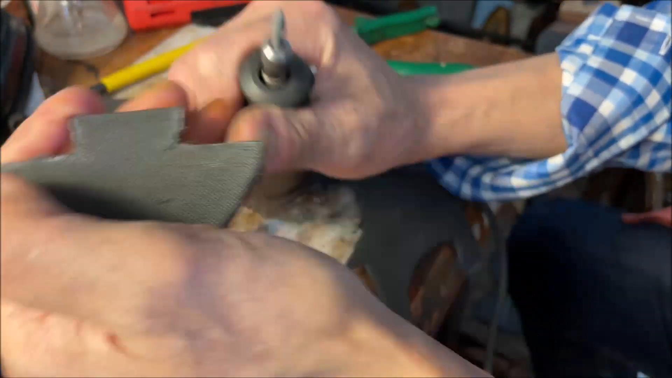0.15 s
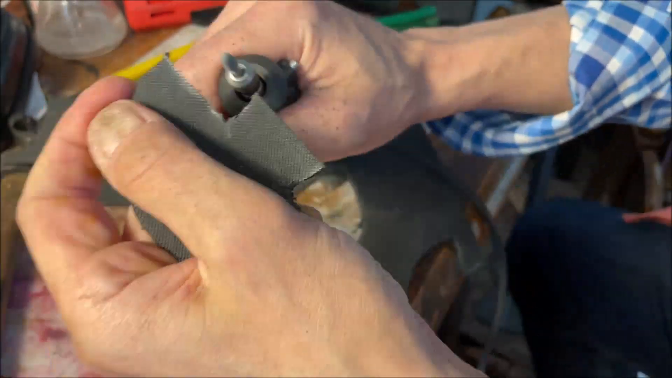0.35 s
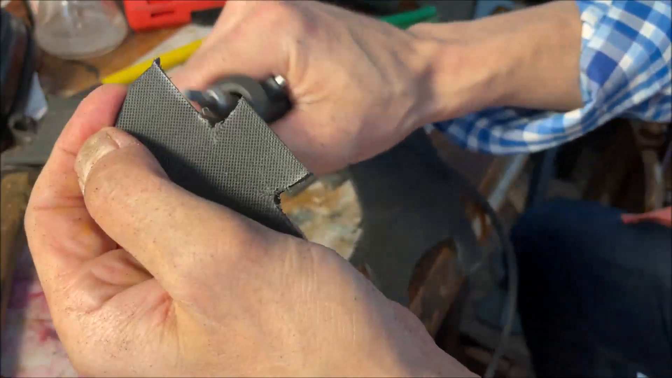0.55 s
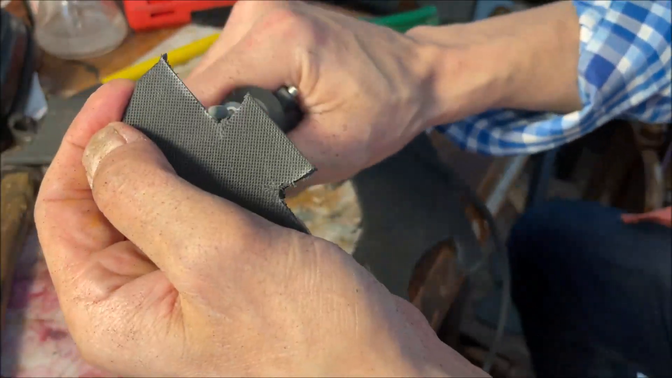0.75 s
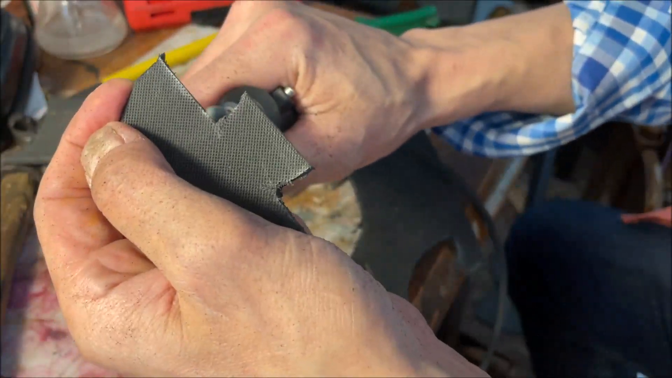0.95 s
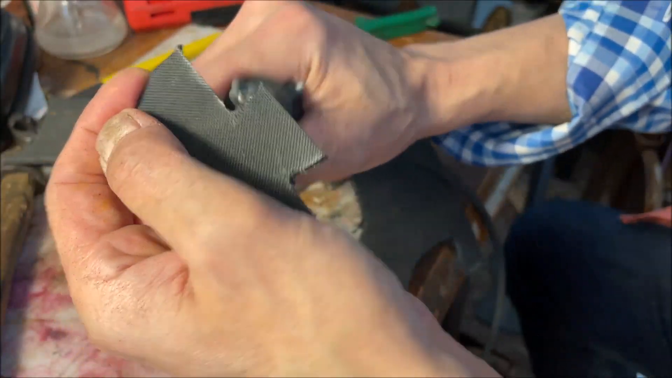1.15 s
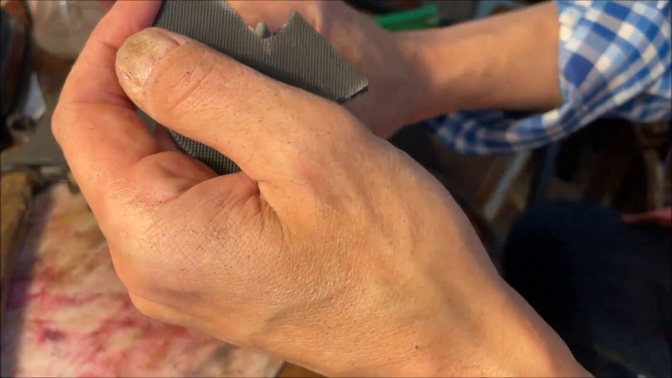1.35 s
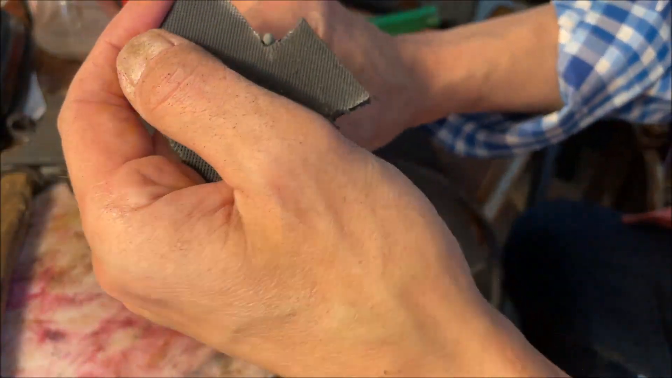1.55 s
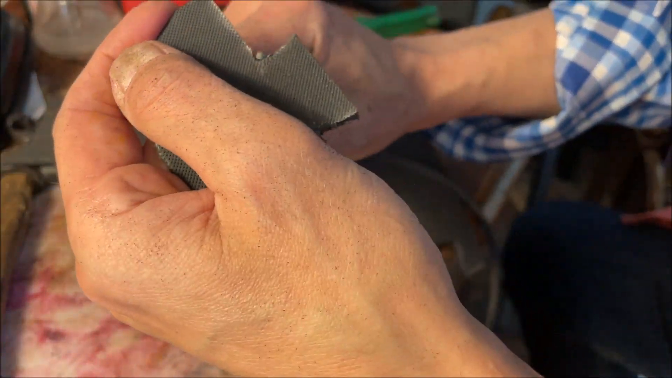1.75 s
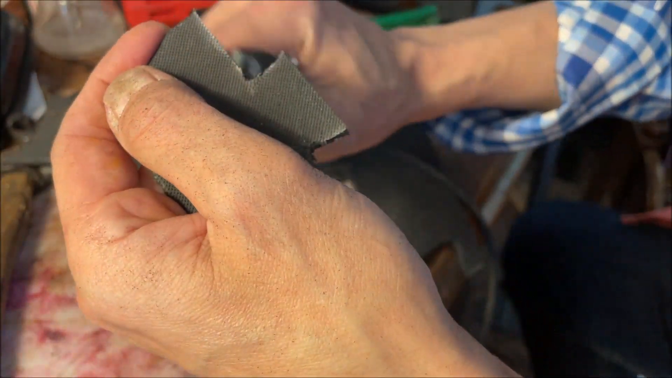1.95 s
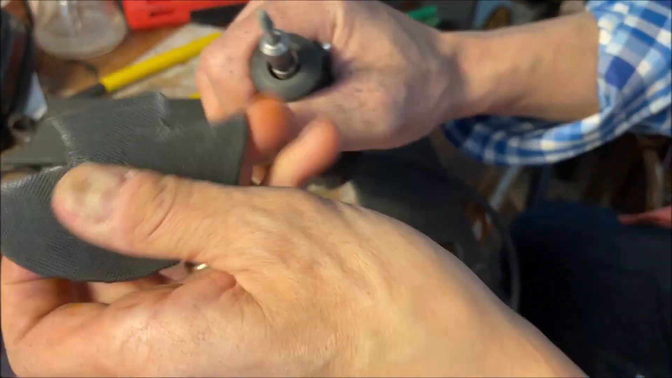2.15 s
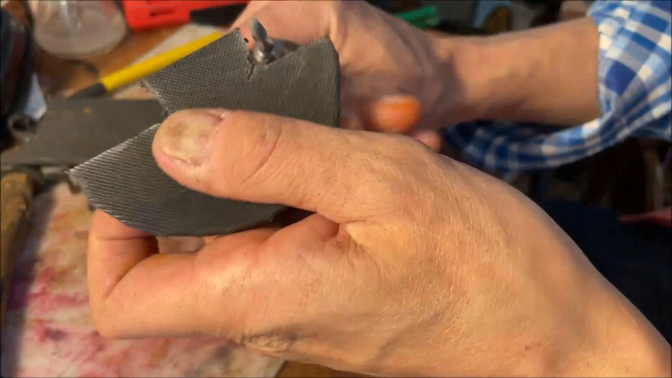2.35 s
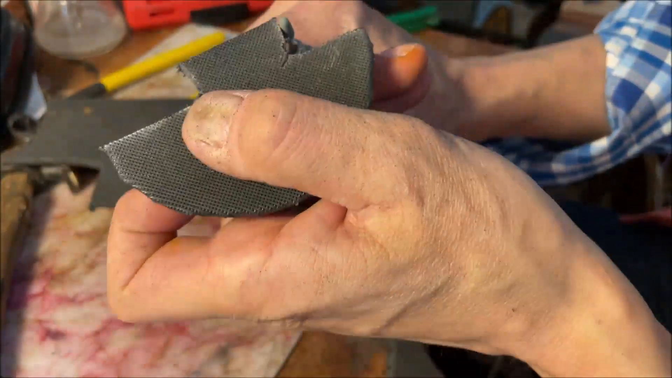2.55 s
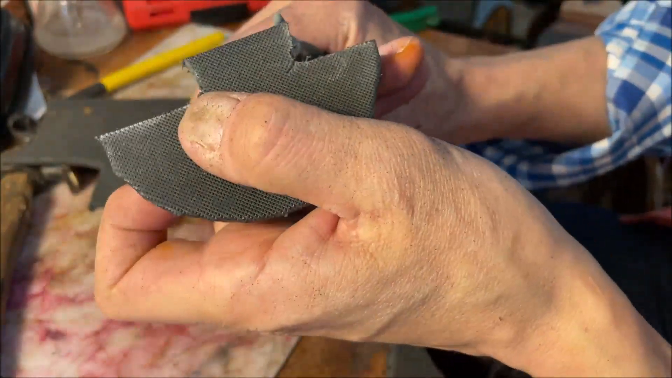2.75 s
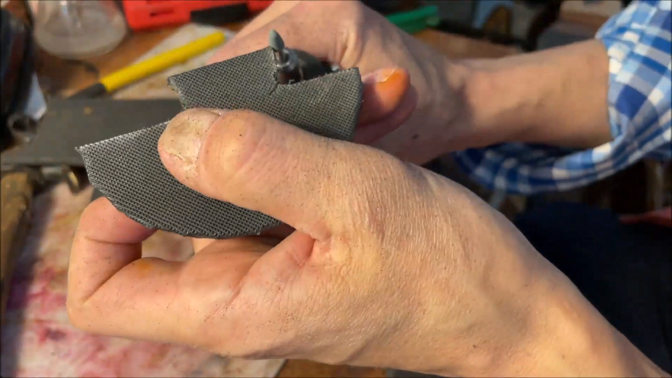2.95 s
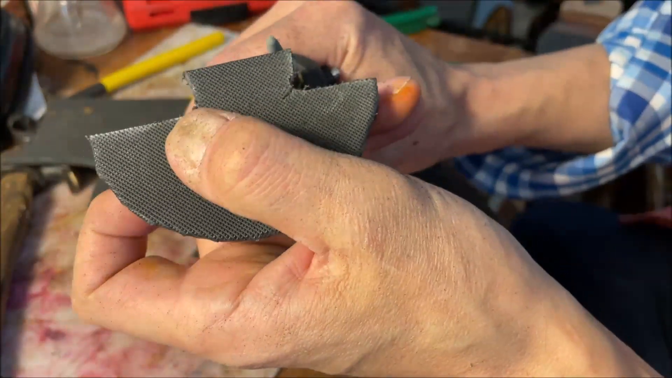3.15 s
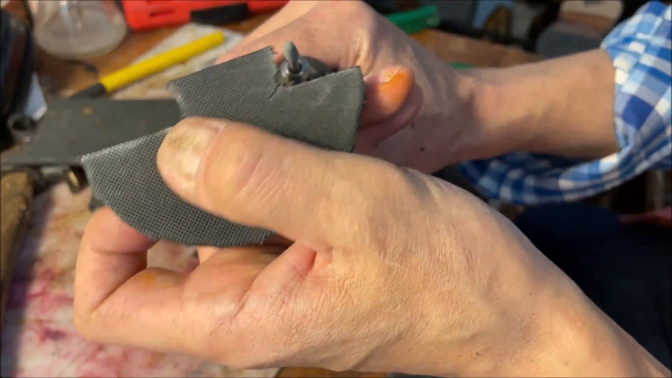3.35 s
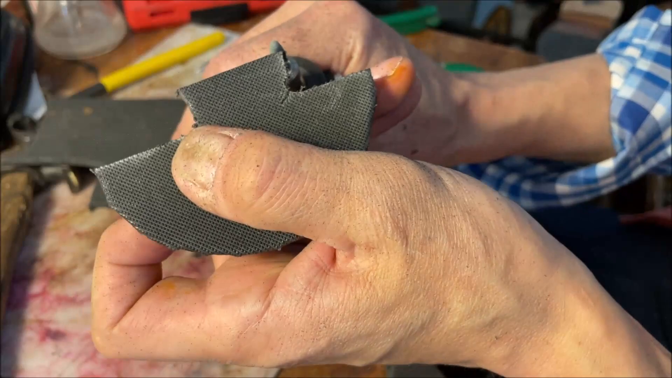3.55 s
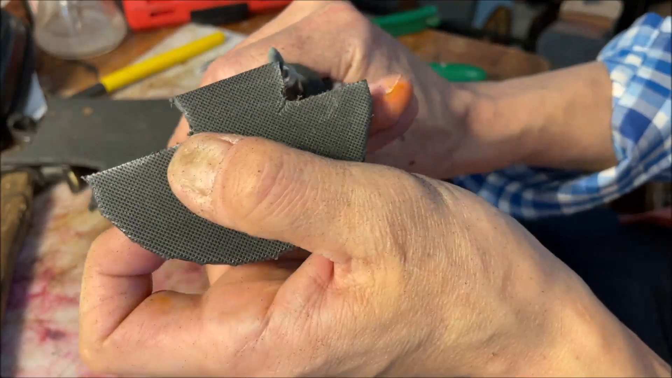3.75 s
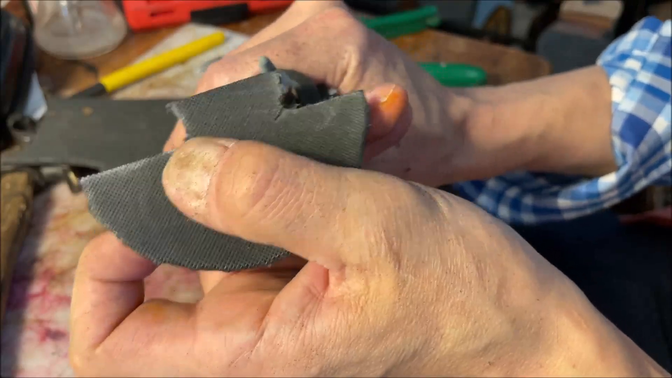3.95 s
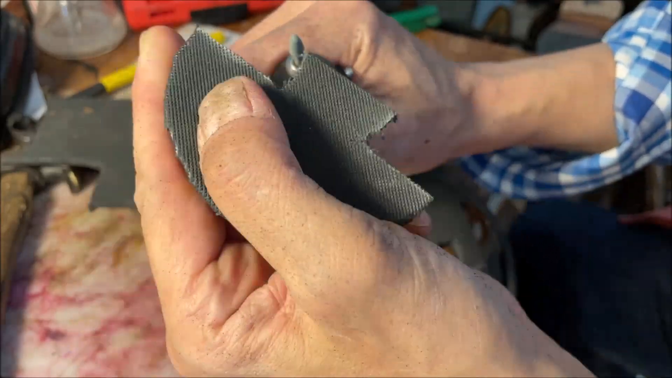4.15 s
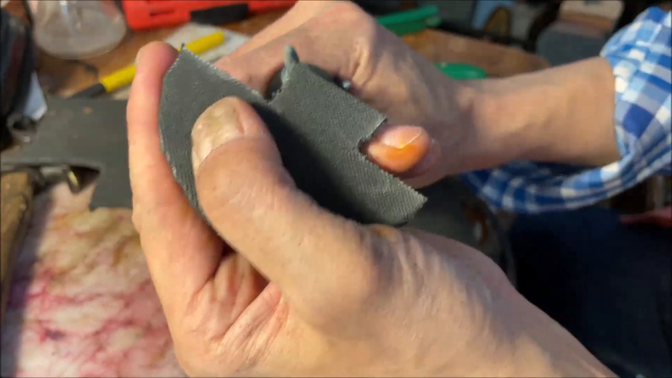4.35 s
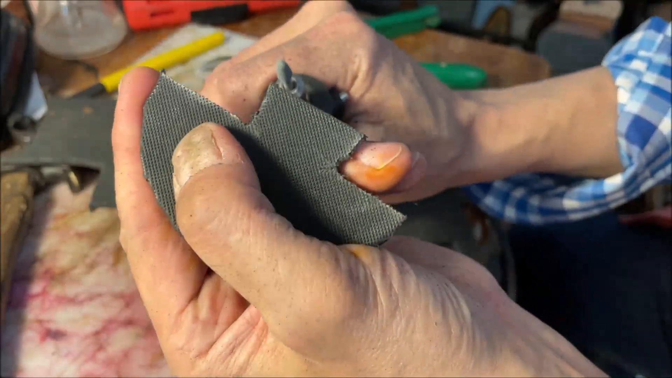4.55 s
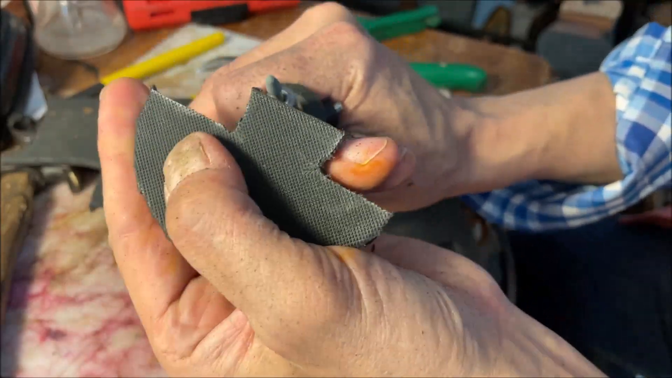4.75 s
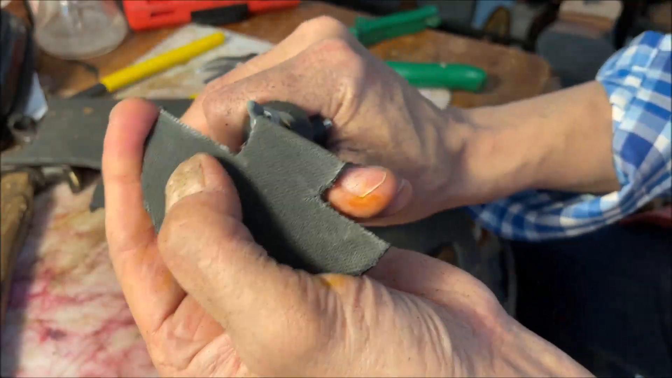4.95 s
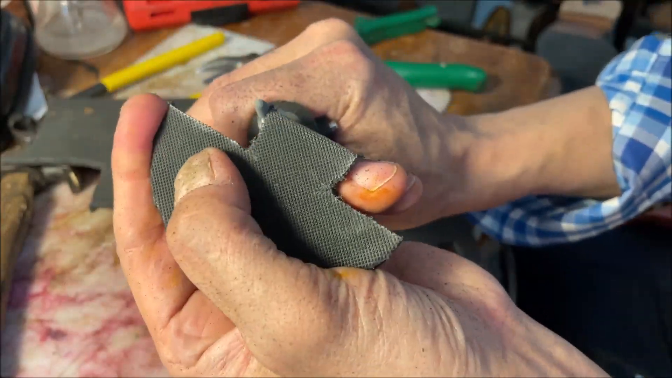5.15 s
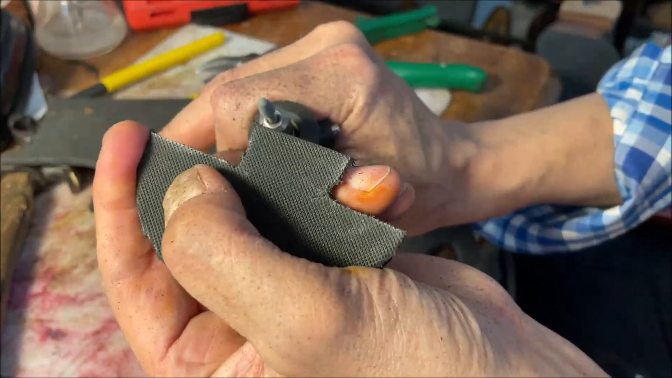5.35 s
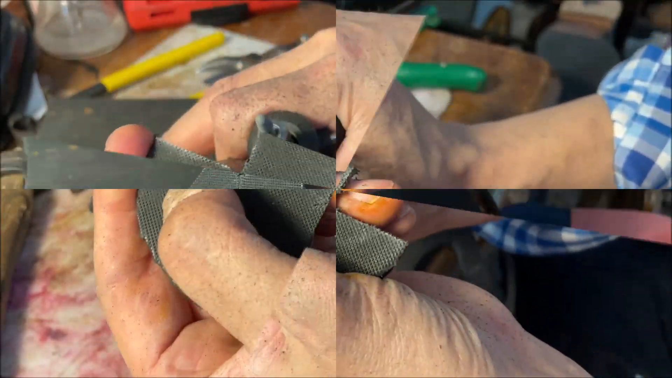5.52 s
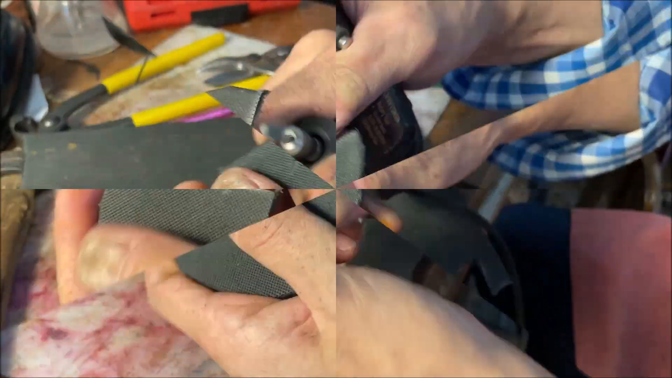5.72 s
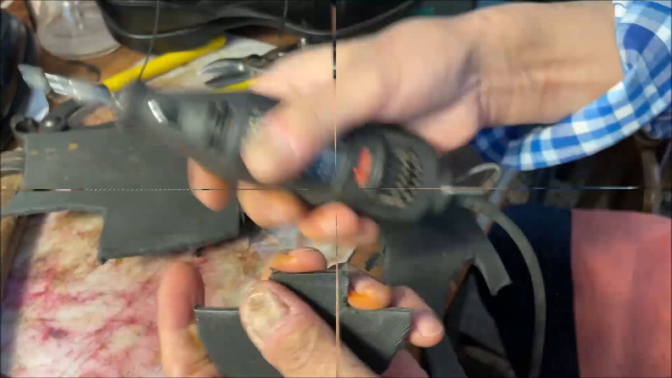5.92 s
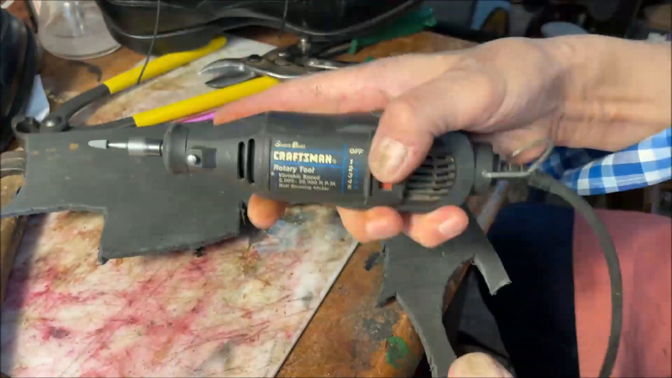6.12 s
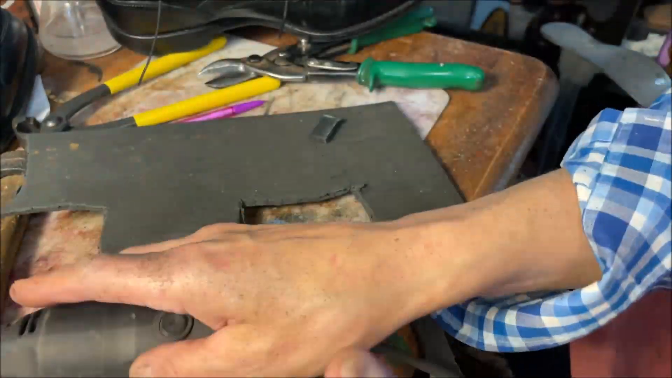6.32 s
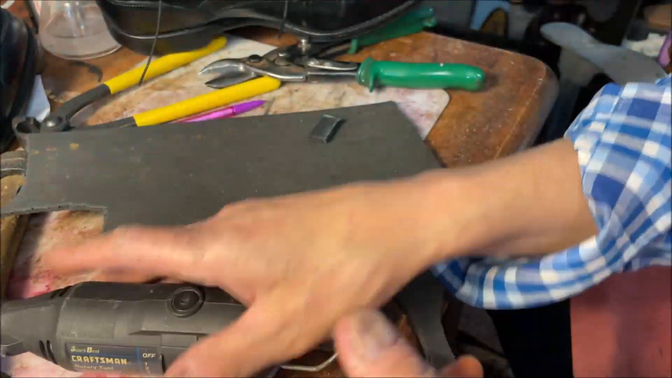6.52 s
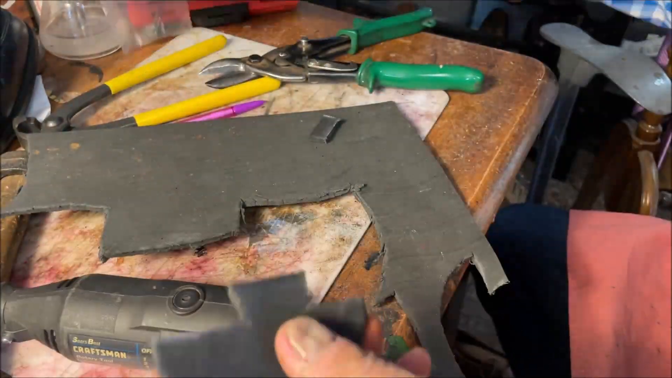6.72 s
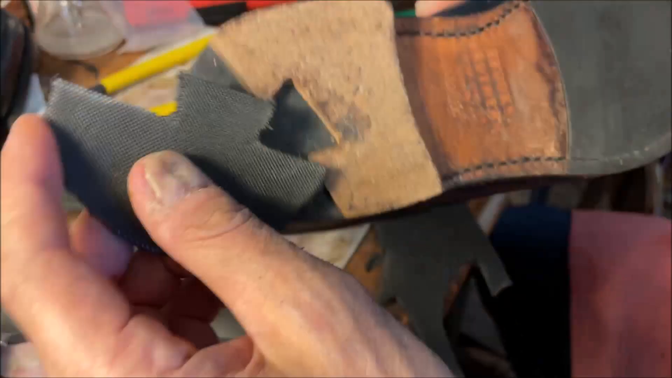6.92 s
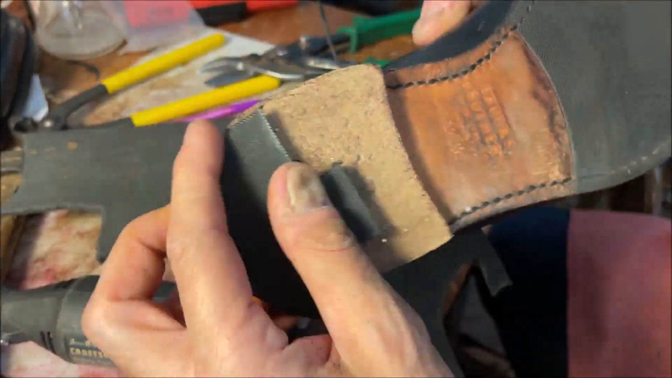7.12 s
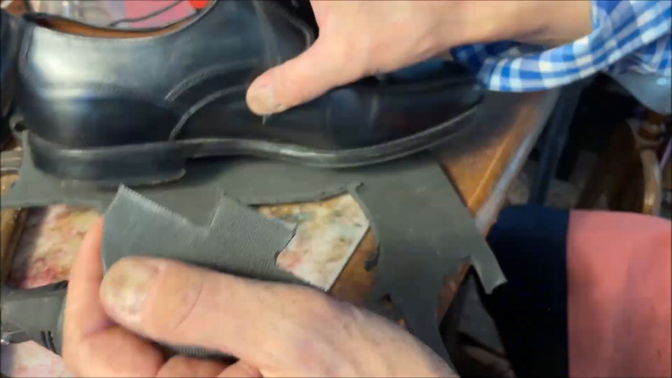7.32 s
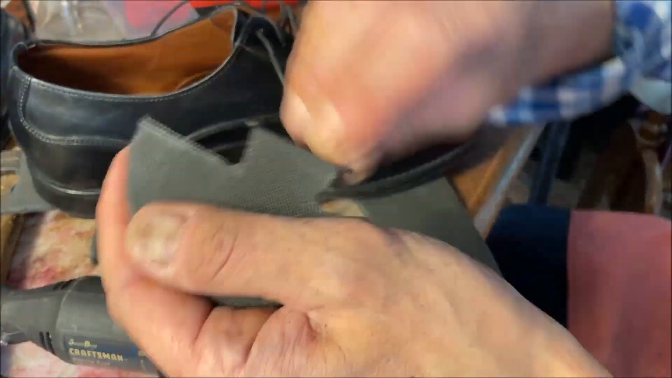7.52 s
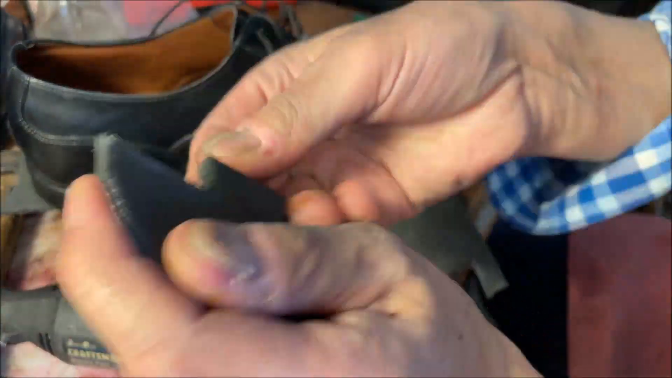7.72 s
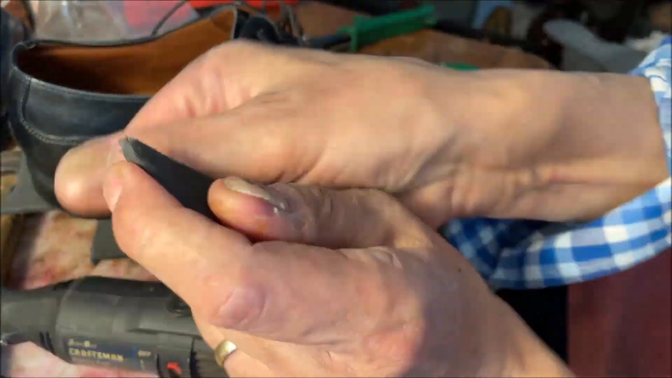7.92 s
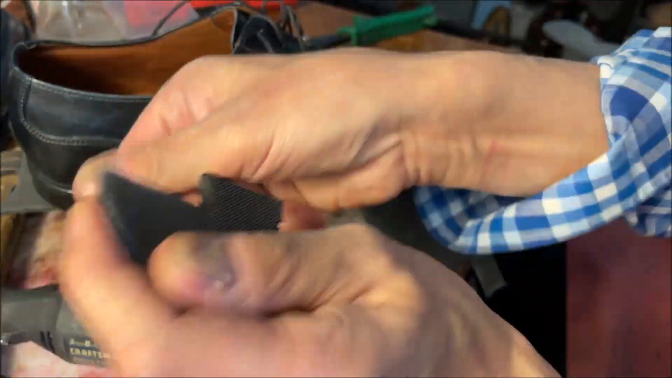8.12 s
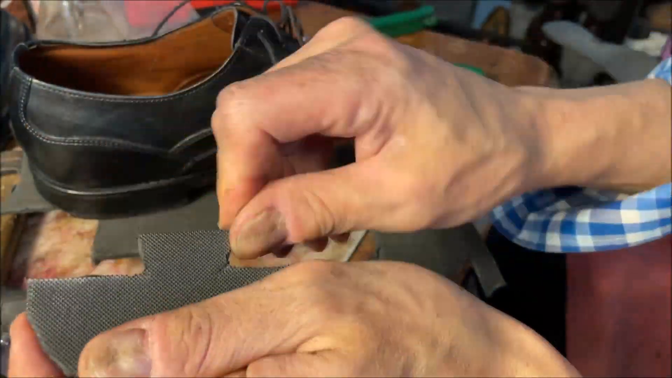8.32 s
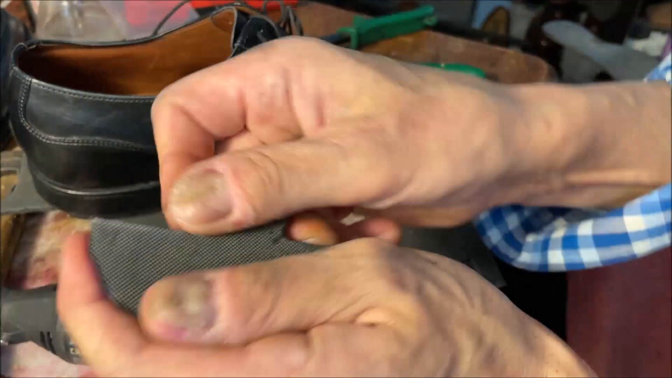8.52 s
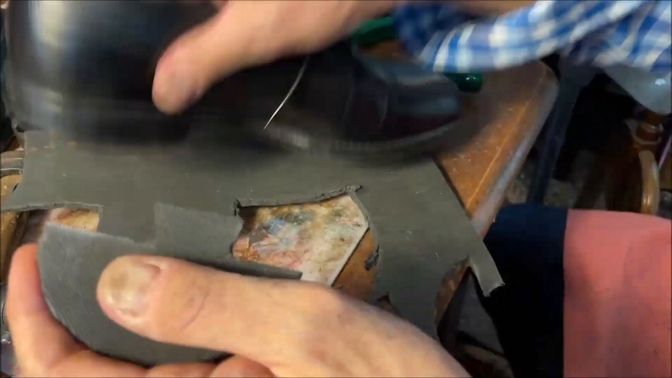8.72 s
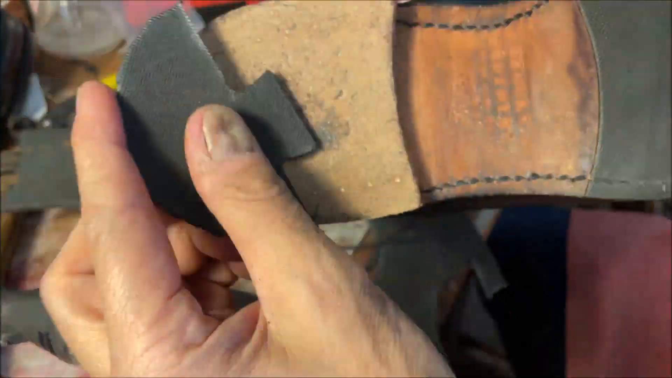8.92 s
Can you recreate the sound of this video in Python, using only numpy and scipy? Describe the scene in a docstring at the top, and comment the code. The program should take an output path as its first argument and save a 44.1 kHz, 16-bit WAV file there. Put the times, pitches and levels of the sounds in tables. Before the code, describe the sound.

A small handheld rotary tool whines at a high pitch close by, rasping, chattering and briefly squealing as it bites into rubber, its pitch dipping with each push. It then runs free and faster, is switched off and rattles on the workbench as it coasts to a stop. Hands tap and set down a shoe and rub the rubber with faint squeaks. A workshop machine hums steadily behind.

```python
"""Grinding rubber with a rotary tool

Over the hum and rush of a workshop machine, a small rotary tool whines: its eight slots sound a tone
that pulses of current chop into bursts. The bit tears, chatters and squeals on the rubber, and the drag
of each bite lowers the pitch. A faster run takes over, is switched off and rattles on the bench as it
coasts to rest. Then hands knock and rub the rubber and a shoe, exciting short rings and squeaks."""
import sys
import numpy as np
from scipy import signal
from scipy.fft import rfft, irfft
from scipy.io import wavfile

SR = 44100
rng = np.random.default_rng(int(sys.argv[2]) if len(sys.argv) > 2 else 0)


def transcribe(u):
    """Save the signal u as a 16-bit wav file named by the first command-line argument.

    u: samples, shape (n,) or (channels, n), limited to [-1, 1]; the rate is SR.
    q: integer samples, one column per channel.
    """
    v = np.clip(np.atleast_2d(u).T, -1, 1)
    q = np.round(v * 32767).astype(np.int16)
    wavfile.write(sys.argv[1], SR, q)


N = 396018
TIME = np.arange(N) / SR

# Spectral shapes: frequency_hz, relative_db
MACHINE_SPECTRUM = [(90, -37), (145, -6.5), (195, 0.5), (310, -3), (420, 3), (600, -4.5), (850, -1.5),
                    (1200, -16), (1500, -7), (1900, -19), (4500, -30.5), (16000, -41)]
SKIN_SPECTRUM = [(1000, -5), (9000, 0), (16000, -12)]  # dry skin and nails on rubber
CONTACT_SPECTRUM = [(200, -15), (1800, 8), (6500, 2), (16000, -7.5)]
BENCH_SPECTRUM = [(90, -70), (310, 1.5), (680, -2), (880, 6), (1100, 4), (1400, -12), (2200, -4),
                  (2900, -12.5), (4000, -10), (7000, -21)]
STEEL_SPECTRUM = [(11000, -22), (12600, -7), (13200, 7), (13500, 8), (14100, -2), (16000, -15)]
HISS_SPECTRUM = [(500, -28.5), (1100, -15), (2100, -6.5), (2950, -9.5), (3550, -.6), (4500, -2.8),
                 (6200, -.5), (12800, -4.5)]
HOUSING_SPECTRUM = [(7000, -13), (8300, -2.5), (9100, 5), (9750, -0.5), (10350, 3.5), (11000, -0.5),
                    (11900, -10)]
# Likeness of the machine's rush in the two channels: frequency_hz, correlation
MACHINE_COHERENCE = [(150, .97), (600, 0.65), (2000, 0.15)]
# Partials of the machine's hum, strongest first: pitch_hz, rms_db
HUM_PARTIALS = [(480, -38.5), (723, -51.5), (856, -52), (3424, -67.5)]
# Fingernails click on the rubber: start_s, level_db
NAIL_CLICKS = [(7.4603, -39), (8.157, -27), (8.587, -40), (8.646, -35)]
# Fingertips brush the rubber: middle_s, level_db, length_s
FINGER_BRUSHES = [(7.963, -51, .02), (8.14, -53, .04)]
# Fingers rub the rubber: middle_s, rub_db, length_s, squeak_db, pitch_hz, pitch_drop_share
FINGER_RUBS = [(8.241, -44.5, 0.05, -60, 3600, .1), (8.31, -54, 0.036, -44, 2450, .05),
               (8.645, -48, 0.05, -52, 3630, .06), (8.815, -51, 0.08, -53.5, 5300, .3),
               (8.937, -50, 0.054, -49, 3540, .04)]
# The shoe is tapped and set down: start_s, tick_db, ring_db
SHOE_IMPACTS = [(7.109, -35, -39), (7.2, -37.5, -42), (7.4012, -23.5, -22), (7.4075, -30, -29)]
# Modes of the shoe: pitch_hz, relative_db
SHOE_MODES = [(447, -4), (877, 0), (1250, -5)]
# The tool knocks on the bench: start_s, tick_db, thud_db
TOOL_KNOCKS = [(6.3805, -22, -13.5), (6.444, -28, -22), (6.764, -29, -33), (6.78, -26.5, -30),
               (6.791, -29, -29), (6.8135, -21, -38)]
# The spinning bit rattles on the bench: start_s, length_s, bench_db, steel_db
RATTLE_BOUTS = [(6.338, 0.07, -39, -60), (6.441, 0.061, -32, -19.5), (6.502, 0.12, -31.5, -22.5),
                (6.622, 0.07, -41, -28.5), (6.692, 0.058, -30.5, -31), (6.75, 0.048, -42, -55)]
# Shaft speed in the free, faster run and as it coasts: time_s, speed_hz
FREE_SPEED = [(5.53, 1626), (5.95, 1698), (6.19, 1723), (6.3, 1340), (6.4, 1005), (6.55, 578), (6.65, 352),
              (6.8, 31)]
# Harmonics of the shaft in the free run: order, level_at_top_speed_db
FREE_HARMONICS = [(1, -51.5), (2, -52), (3, -44), (6, -55), (9, -50)]
# Pushes of the bit into the rubber, at full pressure: start_s, release_s, drag_hz, rasp_db, chatter_db
RUBBER_BITES = [(-0.8, 0.186, 178.0, -36.0, -57.0), (0.45, 1.137, 178.0, -33, -43),
                (1.01, 1.236, 365.0, -35, -44.5), (1.38, 1.507, 179.0, -35.0, -49.0),
                (1.49, 1.839, 155.0, -36.0, -49.0), (1.78, 2.142, 111.0, -33, -45),
                (2.62, 2.848, 177.0, -33.0, -50.0), (2.81, 3.124, 76.0, -35.0, -53.0),
                (3.15, 3.399, 177.0, -36.5, -49.0), (3.44, 3.664, 326.0, -40.0, -56.0),
                (3.79, 3.853, 84.0, -40.0, -56.0), (3.88, 3.962, 188.0, -38.0, -52.0),
                (4.0, 4.042, 144.0, -36.0, -52), (4.09, 4.121, 114.0, -36.0, -51.0),
                (4.38, 4.46, 60, -35, -54), (4.49, 4.62, 110, -34, -52), (4.64, 4.782, 176.0, -33.0, -53.0),
                (4.84, 4.956, 112.0, -35.0, -49.0), (5.0, 5.088, 179.0, -33.0, -51.0),
                (5.1, 5.315, 247.0, -36.0, -52.0)]
# The bit grabs and squeals: middle_s, level_db, length_s, shaft_order
BIT_SQUEALS = [(0.045, -42, .05, 4), (0.145, -42, 0.05, 3), (1.18, -39, 0.09, 3), (4.31, -42, .035, 5),
               (4.43, -43, .03, 3), (4.55, -43, .04, 5), (4.6, -42, .028, 3), (4.7, -42, .025, 5),
               (4.752, -39, 0.053, 3), (4.936, -38.5, 0.038, 3), (5.07, -41, .045, 3),
               (5.22, -41.5, 0.11, 3)]
# Chatter on shaft orders 1, 2, 3, ...: relative_db
CHATTER_HARMONICS = [-4, 0, .5, -2.5, -.5]
# Strength of the whine as the hands move: time_s, level_db
WHINE_ENVELOPE = [(0.0, -27), (0.53, -32.5), (1.21, -28), (1.58, -30), (3.31, -30), (3.36, -28.3),
                  (4.01, -30), (5.5, -31), (6.035, -34)]

FREE_START_S, SHAFT_STOP_S = FREE_SPEED[0][0], FREE_SPEED[-1][0]
RESTING_START_S, GRINDING_END_S = 1.3, 5.6  # the bit rests lightly on the rubber between bites
CURRENT_PULSE_HZ, BAND_EDGE_HZ = 480, 15900


def gain_of(db):
    """Amplitude ratio of a level in decibels."""
    return 10 ** (np.asarray(db) / 20)


def unit_rms(x):
    """Normalisation to an rms of 1."""
    return x / np.sqrt(np.mean(abs(x) ** 2) + 1e-20)


def follow(curve):
    """Linear interpolation of a curve at every sample."""
    return np.interp(TIME, *np.transpose(curve))


def on_bins(spectrum):
    """Interpolation in log frequency onto the bins of a full-length transform."""
    hz, value = np.transpose(spectrum)
    return np.interp(np.log(np.fft.rfftfreq(N, 1 / SR) + 1), np.log(hz), value)


def coloured(x, spectrum):
    """Minimum-phase filtering: folding the cepstrum makes the response causal."""
    cepstrum = irfft(np.log(gain_of(on_bins(spectrum))), N)
    cepstrum[1:N // 2] *= 2
    cepstrum[N // 2 + 1:] = 0
    return irfft(rfft(x) * np.exp(rfft(cepstrum)), N)


def wander(bandwidth_hz):
    """Low-pass noise: a smooth random fluctuation of rms 1."""
    hz = np.fft.rfftfreq(N, 1 / SR)
    return unit_rms(irfft(rfft(rng.standard_normal(N)) * np.exp(-(hz / bandwidth_hz) ** 2), N))


def drift(rate_hz):
    """Complex modulation: amplitude and phase glide between random values."""
    knots = np.arange(0, N / SR, 1 / rate_hz)
    return np.interp(TIME, knots, rng.standard_normal((len(knots), 2)) @ [1, 1j])


def noise_pair(correlation):
    """Partially coherent white noise in two channels."""
    common, separate = rfft(rng.standard_normal((2, N)))
    right = correlation * common + np.sqrt(1 - correlation ** 2) * separate
    return irfft(np.array([common, right]), N)


def panned(x, left_db):
    """A level difference between the channels places a sound to the left."""
    return x * gain_of([[left_db / 2], [-left_db / 2]])


def swell(middle_s, length_s):
    """Gaussian envelope of a stroke."""
    return np.exp(-np.minimum((2 * (TIME - middle_s) / length_s) ** 2, 50))


def ticks(rows, rise_s):
    """Impact envelopes with exponential decay, from rows that begin start_s, level_db."""
    ages = ((np.clip((TIME - s) / rise_s, 0, 20), db) for s, db, *_ in rows)
    return sum(gain_of(db) * age * np.exp(1 - age) for age, db in ages)


def phase_of(hz):
    """Phase in radians is the integral of frequency."""
    return 2 * np.pi * np.cumsum(hz) / SR


def order_tone(shaft, order, flutter):
    """A shaft harmonic of rms 1, modulated in amplitude and phase differently in each channel."""
    sway = np.array([drift(110) for ear in range(2)])
    modulation = 1 + flutter * (sway + sway[::-1] / 2)
    return unit_rms((modulation * np.exp(1j * order * shaft)).real)


def workshop_machine(rush_db=-41.5, waver=0.044):
    """Broadband air noise and a slightly modulated hum superpose."""
    rush = unit_rms(coloured(noise_pair(on_bins(MACHINE_COHERENCE)), MACHINE_SPECTRUM))
    (main_hz, main_db), *faint = HUM_PARTIALS
    hum = gain_of(main_db) * (1 + waver * wander(14)) * np.sin(2 * np.pi * main_hz * TIME)
    hum += sum(gain_of(db) * np.sin(2 * np.pi * hz * TIME + 2 * wander(17.8)) for hz, db in faint)
    return gain_of(rush_db) * rush + np.sqrt(2) * hum


def reverberation(x, t60_s=0.13):
    """Diffuse reflections from the cluttered bench decay exponentially."""
    t = np.arange(SR // 4) / SR
    tail = rng.standard_normal((2, len(t))) * gain_of(-60 * t / t60_s) * (t > .002)
    return signal.fftconvolve(x, tail / np.linalg.norm(tail[0]), axes=1)[:, :N]


def handling(click_s=.0004, rustle_db=-60, spread_db=4, stray_db=-53):
    """Friction and tiny impacts make noise as fingers turn the rubber over and shift their grip."""
    stray_times = rng.uniform(SHAFT_STOP_S, N / SR, size=30)
    stray_ticks = zip(stray_times, stray_db + spread_db * rng.standard_normal(30))
    strokes = gain_of(rustle_db) * swell(middle_s=8.72, length_s=.42)
    strokes += sum(gain_of(db) * swell(s, length) for s, db, length in FINGER_BRUSHES)
    strokes *= gain_of(spread_db * np.tanh(wander(90)))
    clicks = ticks([*NAIL_CLICKS, *stray_ticks], click_s)
    return unit_rms(coloured(noise_pair(0.5), SKIN_SPECTRUM)) * (strokes + clicks)


def rubbing(grain_db=3.0, ring_hz=7250, ring_gain=0.9, buzz_gain=.13):
    """Stick-slip friction of skin on rubber gives a grainy rustle and squeaks that arch in pitch."""
    rustle = unit_rms(coloured(noise_pair(0.1) * gain_of(grain_db * wander(400)), CONTACT_SPECTRUM))
    waver = 1 + 0.025 * wander(500)
    grip = unit_rms(gain_of(4 * np.tanh(wander(150))))
    out = np.zeros((2, N))
    for middle_s, rub_db, length_s, squeak_db, hz, drop in FINGER_RUBS:
        near = abs(TIME - middle_s) < 2 * length_s
        stroke = swell(middle_s, length_s)[near]
        slip = phase_of(hz * waver[near] * (1 - drop * (1 - stroke)))
        overtones = sum((ring_gain if k == round(ring_hz / hz) else buzz_gain) * np.cos(k * slip)
                        for k in range(2, int(BAND_EDGE_HZ / hz) + 1))
        squeak = gain_of(squeak_db) * grip[near] * (np.sin(slip) + overtones)
        out[:, near] += stroke * (gain_of(rub_db) * rustle[:, near] + squeak)
    return out


def shoe(tick_s=.0007, t60_s=.035):
    """Each impact ticks and excites the damped modes of the hollow shoe."""
    out = unit_rms(coloured(noise_pair(0.5), CONTACT_SPECTRUM)) * ticks(SHOE_IMPACTS, tick_s)
    for start_s, _, ring_db in SHOE_IMPACTS:
        age = np.clip(TIME - start_s, 0, 1)
        modes = sum(gain_of(db) * np.sin(2 * np.pi * hz * age) for hz, db in SHOE_MODES)
        out += gain_of(ring_db - 60 * age / t60_s) * modes
    return out


def tool_knocks(tick_s=0.0015, boom=0.1, boom_s=0.004, contact_s=0.0011):
    """Each impact ticks and thuds; a finite contact time favours the low resonances of the bench."""
    blows = np.zeros(N)
    t = np.arange(SR // 20) / SR
    for start_s, _, thud_db in TOOL_KNOCKS:
        start = round(start_s * SR)
        tail = boom * rng.standard_normal(len(t)) * np.exp(-t / boom_s)
        blows[start:start + len(t)] += gain_of(thud_db) * ((t == 0) + tail)
    contact = np.hanning(round(contact_s * SR))
    thuds = coloured(np.convolve(blows, contact)[:N], BENCH_SPECTRUM)
    unit_peak = abs(coloured(np.pad(contact, (0, N - len(contact))), BENCH_SPECTRUM)).max()
    tick_noise = unit_rms(coloured(noise_pair(0.5), CONTACT_SPECTRUM))
    return tick_noise * ticks(TOOL_KNOCKS, tick_s) + thuds / unit_peak


def bout(start_s, length_s, attack_s=0.002, release_s=0.005):
    """Contact envelope: a linear attack, a hold, and exponential decay as the bit lifts off."""
    attack = np.clip((TIME - start_s) / attack_s, 0, 1)
    return attack * np.exp(-np.maximum(TIME - start_s - length_s, 0) / release_s)


def rattle(shaft, speed, uneven_db=2.0, bounce_db=3.3, scrape_turns=0.12):
    """Forced vibration: a blow and a scrape each turn drive the bench; scrapes also ring the bit."""
    on_bench = np.max([gain_of(db) * bout(s, length) for s, length, db, _ in RATTLE_BOUTS], axis=0)
    on_steel = np.max([gain_of(db) * bout(s, length) for s, length, _, db in RATTLE_BOUTS], axis=0)
    touching = (TIME > RATTLE_BOUTS[0][0]) & (TIME < SHAFT_STOP_S)
    turn = shaft / (2 * np.pi) % 1
    new_turn = np.diff(turn, prepend=0) < 0
    blows = new_turn * gain_of(uneven_db * np.tanh(wander(400))) / np.sqrt(speed)
    blows = signal.sosfilt(signal.butter(3, 750, "highpass", fs=SR, output="sos"), blows)
    scrapes = noise_pair(0.89) * np.exp(-turn / scrape_turns) * gain_of(bounce_db * np.tanh(wander(350)))
    boom = reverberation(blows[None], t60_s=0.025)[0]
    shaking = unit_rms(boom * touching) + 0.45 * unit_rms(scrapes[0] * touching)
    bench, steel = coloured(shaking, BENCH_SPECTRUM), coloured(scrapes, STEEL_SPECTRUM)
    return bench / bench[touching].std() * on_bench + steel / steel[:, touching].std() * on_steel


def repeating(x, speed, share):
    """Comb filtering: part of a noise returns with each turn, which gives it a rough pitch."""
    now = np.arange(N)
    return x + sum(share ** k * np.array([np.interp(now - k * SR / speed, now, ear) for ear in x])
                   for k in range(1, 4))


def fan_level(slow_db=-36.1, fast_db=-31.4, db_per_decade=33, passing_db=3.7):
    """Fan noise is steady in the slow run; in the fast run it follows a power law of speed."""
    speed = follow(FREE_SPEED)
    free_db = fast_db + db_per_decade * np.log10(speed / speed.max())
    free_db += passing_db * swell(middle_s=5.88, length_s=0.42)  # the fan passes close by
    return gain_of(np.where(TIME < FREE_START_S, slow_db, free_db)) * (TIME < SHAFT_STOP_S)


def hiss(loaded_speed, tearing, grit_db=1.5, flicker_db=1.0):
    """Tearing crumbs of rubber and the cooling fan's air take a repetition pitch from the shaft."""
    speed = np.where(TIME < FREE_START_S, loaded_speed, follow(FREE_SPEED))
    grit = unit_rms(gain_of(grit_db * wander(1500) + flicker_db * wander(25)))
    crumbs = coloured(repeating(noise_pair(0.36) * grit, speed, share=.4), HISS_SPECTRUM)
    air = coloured(repeating(noise_pair(0.36) * grit, speed, share=.13), HISS_SPECTRUM)
    return panned(tearing * unit_rms(crumbs) + fan_level() * unit_rms(air), left_db=3.2)


def free_run(slots_db=-40.5, pulse_cycles=0.13, coasting_share=.45, flare_db=-32.5):
    """Shaft harmonics fall in pitch and level as the tool coasts, its bit rattling on the bench."""
    speed = follow(FREE_SPEED)
    shaft = phase_of(speed * (1 + .006 * wander(200)))
    tones = sum(gain_of(db) * order_tone(shaft, k, flutter=1.2) for k, db in FREE_HARMONICS)
    # the eight slots sing in bursts while the current is on, then only faintly
    bursts = unit_rms(np.exp(-(CURRENT_PULSE_HZ * TIME % 1 - .5) ** 2 / (2 * pulse_cycles ** 2)))
    drive = np.where(TIME < TIME[speed.argmax()], bursts, coasting_share)
    tones += gain_of(slots_db) * drive * order_tone(shaft, 8, flutter=0.66)
    flare = gain_of(flare_db) * swell(middle_s=5.972, length_s=0.05)  # the third order rasps briefly
    tones += flare * order_tone(shaft + 0.6 * wander(400), 3, flutter=0.9)
    tones *= speed / speed.max() * (TIME > FREE_START_S) * (TIME < SHAFT_STOP_S)
    return panned(tones + rattle(shaft, speed), left_db=5)


def pressure(start_s, release_s, lift_s=0.015):
    """The contact force of a bite rises linearly, then drops as the hand lets go."""
    rise = np.clip((TIME - start_s) / (release_s - start_s), 0, 1)
    return rise * np.clip((release_s - TIME) / lift_s + .5, 0, 1)


def motor_speed(unloaded_hz=1386.4, start_hz=1296, resting_drag_hz=27, inertia_s=0.141):
    """Drag slows the shaft; inertia smooths each sag and recovery as a first-order lag."""
    drag = resting_drag_hz * (TIME > RESTING_START_S) * (TIME < GRINDING_END_S)
    drag = drag + sum(hz * pressure(start, release) for start, release, hz, _, _ in RUBBER_BITES)
    pole = np.exp(-1 / (inertia_s * SR))
    sag, _ = signal.lfilter([1 - pole], [1, -pole], drag, zi=[unloaded_hz - start_hz])
    return unloaded_hz - sag


def abrasion(rasp_power=0.27, chatter_power=0.42, grab_rasp_db=5, grab_chatter_db=-8):
    """Rasp and chatter amplitudes follow power laws of pressure; the strongest bite or grab prevails."""
    strength = np.zeros((2, N))
    powers = np.array([[rasp_power], [chatter_power]])
    for start_s, release_s, _, rasp_db, chatter_db in RUBBER_BITES:
        bite = gain_of([[rasp_db], [chatter_db]]) * pressure(start_s, release_s) ** powers
        strength = np.maximum(strength, bite)
    for middle_s, db, length_s, _ in BIT_SQUEALS:
        grab = gain_of([[db + grab_rasp_db], [db + grab_chatter_db]]) * swell(middle_s, length_s)
        strength = np.maximum(strength, grab)
    return strength


def whine(shaft, load, shake_rad=.33, pulse_cycles=0.072, floor=0.039, echo=0.36, flicker_db=0.9):
    """Amplitude modulation: current pulses chop the eight-slot tone, and the load shakes its phase."""
    slots = np.exp(1j * (8 * shaft + shake_rad * load * wander(300)))
    lag_cycles = .34 + 0.08 * wander(1.8)  # the moving hands reflect each burst
    cycle = CURRENT_PULSE_HZ * TIME + 0.014 * wander(300)
    burst, reflected = (np.exp(-((cycle - lag) % 1 - .5) ** 2 / (2 * pulse_cycles ** 2))
                        for lag in (0, lag_cycles))
    # each sideband swells and fades by itself
    sidebands = .022 * sum(drift(11) * np.exp(2j * np.pi * k * cycle) for k in range(-3, 4))
    ears = []
    for lead_rad in (1.0, 0):
        reflection = echo * reflected * np.exp(1j * (3.8 + wander(1)))
        ears.append((slots * np.exp(1j * lead_rad) * (burst + floor + sidebands + reflection)).real)
    sound = panned(unit_rms(coloured(np.array(ears), HOUSING_SPECTRUM)), left_db=6.6)
    level_db = follow(WHINE_ENVELOPE) + flicker_db * wander(58)
    return sound * gain_of(level_db) * (TIME < WHINE_ENVELOPE[-1][0])


def grinding(speed, tearing, chattering, load_wobble=.0018, motor_tone_db=-53):
    """Friction makes the bit chatter and squeal at harmonics of the shaft while the motor whines."""
    load = tearing / tearing.max()
    shaft = phase_of(speed * (1 + (0.0005 + load_wobble * load ** 2) * wander(35)))
    # the bit catches at a slightly different angle each turn, and keeps losing its grip
    skidding = shaft + .08 * wander(250)
    grip = unit_rms(gain_of(3.5 * np.tanh(wander(45))))
    chatter = grip * sum(gain_of(db) * order_tone(skidding, k, flutter=0.55)
                         for k, db in enumerate(CHATTER_HARMONICS, 1))
    # higher squeals are harsher
    orders = {order for *_, order in BIT_SQUEALS}
    tones = {k: order_tone(shaft + .05 * wander(400), k, flutter=k ** 2 / 30) for k in orders}
    squeals = sum(gain_of(db) * swell(s, length) * tones[k] for s, db, length, k in BIT_SQUEALS)
    motor_tone = gain_of(motor_tone_db) * tones[3]
    cutting = panned(chatter * chattering, left_db=4.4) + panned(squeals + motor_tone, left_db=13)
    return whine(shaft, load) + cutting * (TIME < GRINDING_END_S)


def scene():
    """Superposition of the tool and the hands close by with the machine behind."""
    speed = motor_speed()
    tearing, chattering = abrasion()
    at_bench = free_run() + tool_knocks() + shoe() + handling() + rubbing()
    reflections = gain_of(-12) * reverberation(at_bench)
    tool = grinding(speed, tearing, chattering) + hiss(speed, tearing)
    return tool + at_bench + reflections + workshop_machine()


def record(dry):
    """Band limiting removes the deepest bass and the highest treble."""
    dry = signal.sosfilt(signal.butter(2, 48, "highpass", fs=SR, output="sos"), dry)
    lowpass = signal.firwin(511, BAND_EDGE_HZ, window=("kaiser", 9), fs=SR)
    return signal.oaconvolve(dry, lowpass[None], "same")


dry = scene()
out = record(dry)
transcribe(out)
```